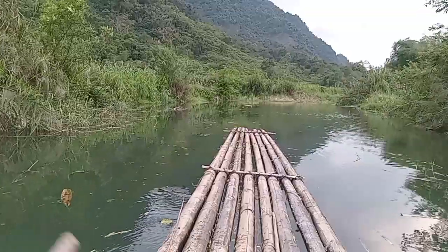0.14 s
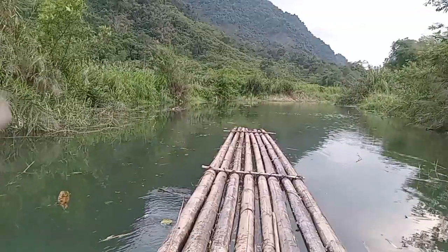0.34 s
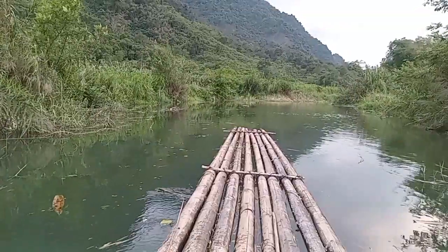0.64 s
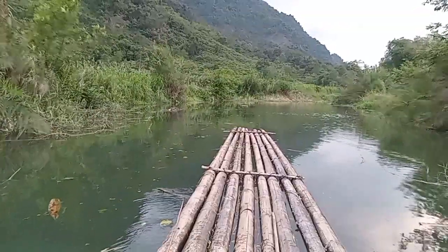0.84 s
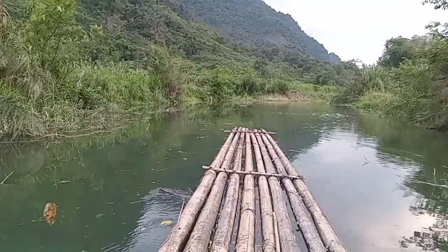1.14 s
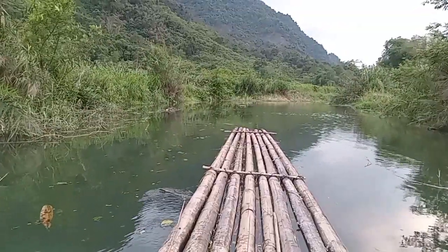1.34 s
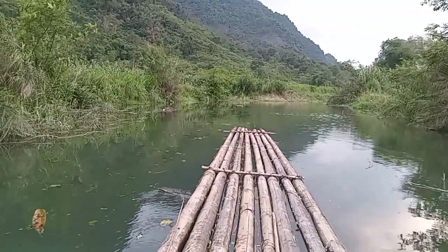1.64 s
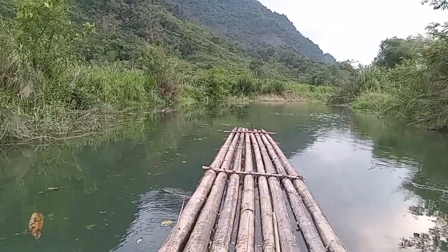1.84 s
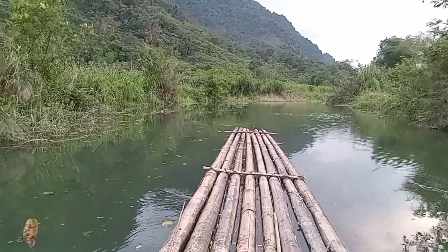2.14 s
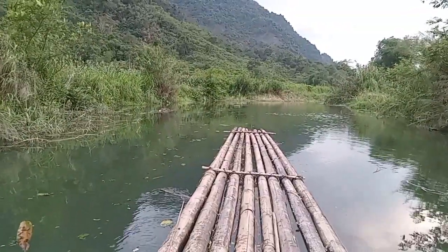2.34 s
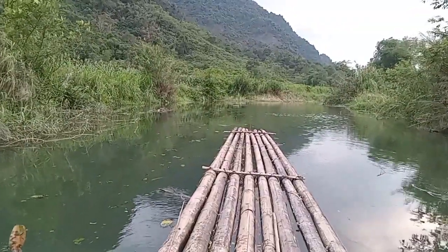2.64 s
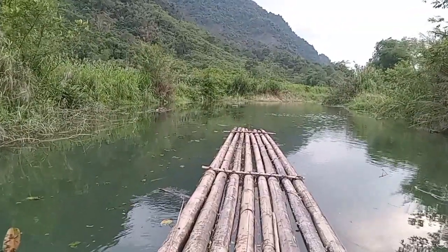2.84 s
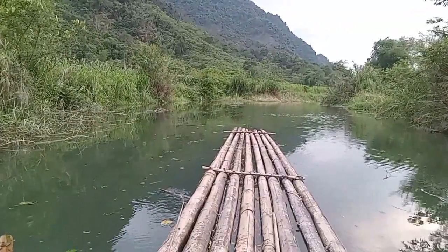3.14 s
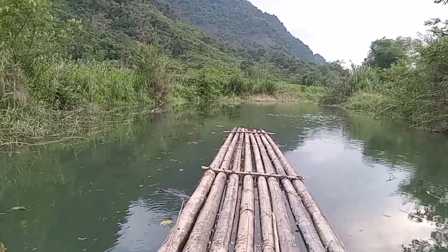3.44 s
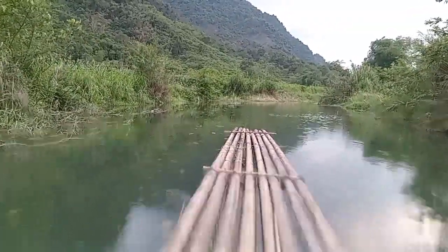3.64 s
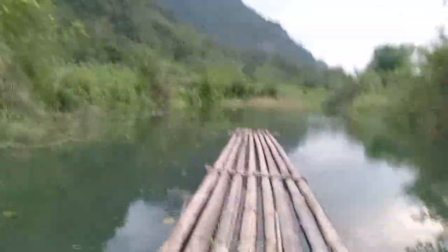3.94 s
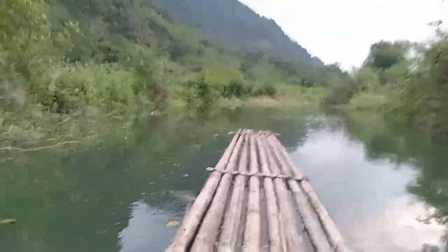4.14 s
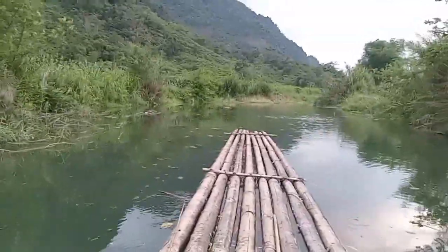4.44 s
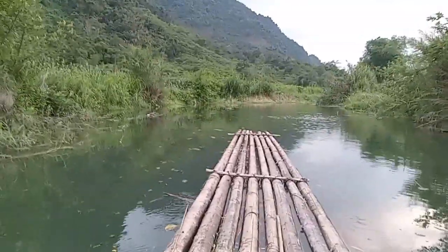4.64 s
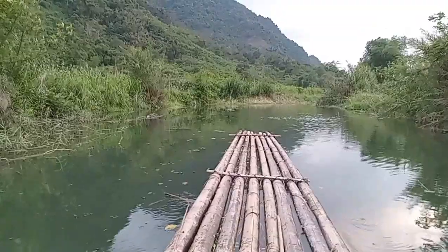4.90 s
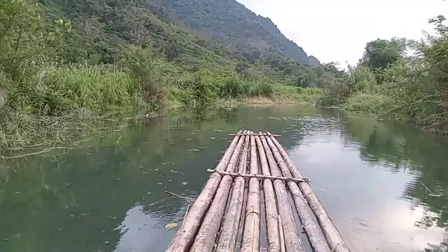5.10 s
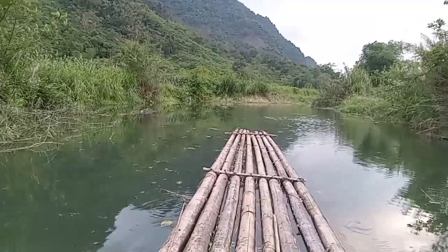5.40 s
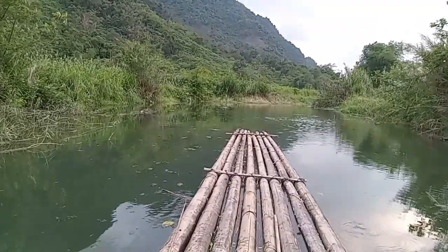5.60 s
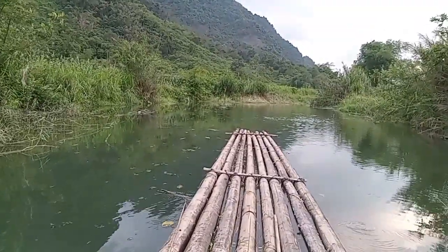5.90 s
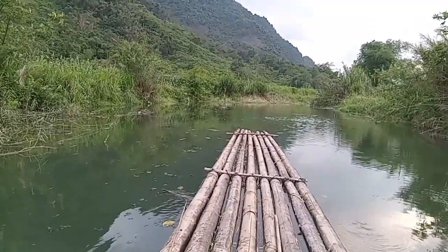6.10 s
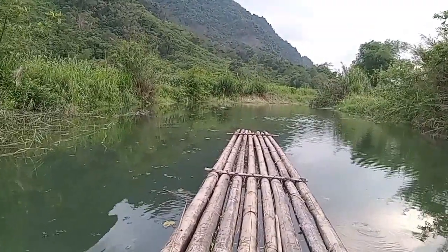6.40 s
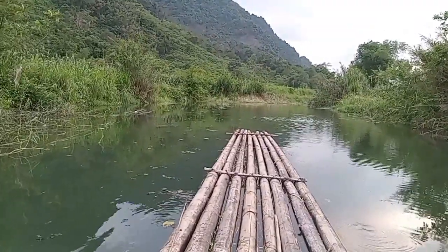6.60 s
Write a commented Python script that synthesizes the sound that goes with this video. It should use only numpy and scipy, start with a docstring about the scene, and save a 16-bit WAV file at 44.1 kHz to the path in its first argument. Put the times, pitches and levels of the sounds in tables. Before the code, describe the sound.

Water slaps, plops and glugs in short irregular bursts against a bamboo raft drifting on a calm river, over a thin constant bubbly fizz.

```python
"""Bamboo raft on a calm river

Water slaps and spatters against the poles in short irregular bursts, made of shaped noise and small bubbles.
Trapped air plops and glugs with rising pitch (gliding sines), and single drops tick (very short noise).
A fine high fizz of tiny ringing bubbles runs all the way through.
The raft's poles ring along, and it rumbles faintly (low noise) under the heavier water."""
import sys
import numpy as np
from scipy import signal
from scipy.fft import rfft, irfft, next_fast_len
from scipy.io import wavfile

SR = 44100
rng = np.random.default_rng(int(sys.argv[2]) if len(sys.argv) > 2 else 0)


def master(y):
    """Save y as 16-bit WAV."""
    cut = np.clip(np.atleast_2d(y).T, -1, 1)
    pcm = np.round(cut * 32767)  # scale
    wavfile.write(sys.argv[1], SR, pcm.astype(np.int16))


N = 297939
PADDED = next_fast_len(N, real=True)  # a length that the Fourier transform handles quickly

# wavelets running along the poles: t/s, slosh level/dB, gurgle level/dB, spatter level/dB, fizz level/dB,
# gurgle f/Hz, length/s
WAVELETS = [(0.721, -64.5, -62, -68.5, -61, 258, 0.12), (0.76, -59.5, -54, -58.5, -55, 520, 0.16),
            (1.098, -76, -59.5, -65.5, -52.5, 767, 0.11), (1.246, -90, -79, -66, -60.5, 700, 0.054),
            (1.931, -78, -84, -65.5, -63.5, 396, 0.046), (2.248, -65, -53, -62.5, -75, 794, .14),
            (2.32, -89, -62, -85, -67, 500, 0.12), (2.488, -66, -61, -65, -58.5, 455.7, 0.16),
            (2.87, -88, -59, -66.5, -61, 480, 0.21), (3.436, -70, -80, -68.5, -79, 755, 0.17),
            (3.567, -67, -44, -55, -52, 339, .17), (3.762, -55, -58, -59, -58, 330, 0.17),
            (3.88, -78, -67, -60, -73, 1400, 0.3), (3.967, -63.5, -70, -68, -56.5, 507, 0.36),
            (4.152, -57, -58.5, -61, -56.5, 330, .085), (4.34, -85, -58, -66.5, -52, 1530, 0.039),
            (4.532, -54, -53, -61.5, -55.5, 285, 0.12), (4.675, -64, -50.5, -84, -78, 290, 0.038),
            (4.89, -79.5, -86, -74.5, -59.5, 435, 0.5), (5.455, -53, -57, -60.5, -54.5, 717, 0.12),
            (5.691, -73, -74, -69.5, -58.5, 448, 0.2), (6.542, -84, -87, -76, -60, 450, 0.058)]
WAVELET_ATTACK = 0.25  # share of a wavelet's length that sets how slowly it swells

# colour of the fine fizz, also used for drops: f/Hz, level per Hz/dB
FIZZ_COLOUR = [(2500, -17), (3700, -8), (4100, -7.5), (4550, -1), (5200, -6.5), (6200, -2.5), (7000, 1),
               (7900, -1.5), (8900, 2.5), (10000, 0), (11000, -5.5), (12200, -13), (14000, -22),
               (15700, -25.5)]


def from_db(db):
    """Turn decibels into a gain."""
    return 10 ** (np.asarray(db) / 20)


def rms_one(x):
    """Scale a sound to an average strength (rms) of 1."""
    return x / np.sqrt(np.mean(x ** 2) + 1e-20)


def add(out, s, sound):
    """Mix a sound in at time s."""
    at = max(round(s * SR), 0)
    out[at:at + len(sound)] += sound[:max(N - at, 0)]


def coloured(x, spectrum):
    """Give a steady texture its colour, falling away beyond the ends; rms 1."""
    hz, db = np.transpose(spectrum)
    octave = np.log2(np.maximum(np.arange(PADDED // 2 + 1) * SR / PADDED, 1))
    octaves_outside = np.abs(octave - np.clip(octave, np.log2(hz[0]), np.log2(hz[-1])))
    gain = from_db(np.interp(octave, np.log2(hz), db) - 18 * octaves_outside)
    return rms_one(irfft(rfft(x, PADDED) * gain, PADDED)[:N])


def resonance(x, hz, width_hz):
    """Ring at one pitch: a two-pole resonance with gain 1 on top; a narrower one rings longer."""
    r = np.exp(-np.pi * width_hz / SR)
    numerator = np.array([1, 0, -1]) * (1 - r * r) / 2
    denominator = [1, -2 * r * np.cos(2 * np.pi * hz / SR), r * r]
    return signal.lfilter(numerator, denominator, x + 1e-18)


def flutter(per_s, depth_db):
    """A gain that wanders at random between values drawn per_s times a second."""
    knots = rng.standard_normal(4000)
    wander = np.interp(np.arange(N) / SR * per_s, np.arange(len(knots)), knots)
    return from_db(depth_db * wander)


def burst(length, attack):
    """Envelope of height 1 that swells, then dies away."""
    t = np.arange(int(6 * length * SR) + 2) / SR
    swelling = 1 - np.exp(-(t / (attack * length)) ** 2)
    shape = swelling * np.exp(-2 * t / length)
    return t, shape / shape.max()


def swells(rows, attack, calm_db):
    """Level of a texture: each row (t/s, level/dB, length/s) swells and dies over the calm; their powers add."""
    power = np.full(N, from_db(calm_db) ** 2)
    for s, db, length in rows:
        add(power, s, (from_db(db) * burst(length, attack)[1]) ** 2)
    return np.sqrt(power)


def grains(spectrum, per_s, size_db, sharpness, smooth_db):
    """Countless tiny bubbles of random size and pitch, over the smooth noise of those too small to tell apart."""
    present = rng.random(N) < per_s / SR
    sizes = from_db(size_db * np.minimum(rng.exponential(1, N), 4))
    clicks = present * sizes * rng.choice([-1, 1], N)
    pitches = np.geomspace(spectrum[0][0], min(spectrum[-1][0], SR / 2 - 2000), 20)
    dealt = rng.integers(0, 20, N)  # which pitch each click sets ringing
    rings = sum(resonance(clicks * (dealt == k), hz, hz / sharpness) for k, hz in enumerate(pitches))
    smooth = coloured(rng.standard_normal(N), spectrum)
    return rms_one(coloured(rings, spectrum) + from_db(smooth_db) * smooth)


def splashes(slosh, spray, blur_db=-6, blur_width=0.17):
    """Each splash shoves the water, throws spray and leaves a cloud of small bubbles in a blur of the same pitch."""
    # sharp splashes: t/s, slosh level/dB, spatter level/dB, spray level/dB, spatter f/Hz, length/s
    splash_rows = [(0.837, -62, -72, -58, 1140, 0.089), (0.897, -60, -54, -55.5, 1567, .014),
                   (1.116, -73, -66, -57.5, 1570, 0.057), (2.279, -73, -67, -66, 1356, .06),
                   (2.467, -69, -47.5, -68, 824, .018), (2.4968, -37, -37.5, -38.5, 1060, 0.0056),
                   (2.5, -43, -42, -61, 2480, 0.0095), (2.919, -70, -51.5, -59, 1327, 0.023),
                   (3.575, -41, -36.5, -35, 2100, 0.0094), (3.588, -26, -43, -37.5, 1300, .017),
                   (3.646, -37, -48.5, -49, 957, 0.019), (3.691, -43, -54.5, -51, 2780, 0.0087),
                   (3.76, -41, -44.5, -60, 1015, 0.01), (3.781, -44, -48, -47.5, 1156, 0.02),
                   (3.814, -28, -53, -42.5, 1405, 0.013), (3.917, -82, -52.5, -46, 1800, 0.014),
                   (4.011, -39, -48.5, -51.5, 1640, 0.021), (4.109, -50.5, -59, -51.5, 2030, 0.015),
                   (4.206, -40.5, -51.5, -56, 2380, 0.01), (4.519, -44.5, -48.5, -61, 1550, 0.025),
                   (4.595, -39.5, -39, -50, 1230, 0.0067), (4.603, -48.5, -44.5, -42.5, 1756, .015),
                   (5.463, -54, -48, -50, 2380, 0.022), (5.5, -55, -49, -54, 2360, .0093),
                   (5.684, -56, -65, -59.5, 1170, 0.026)]
    out = np.zeros(N)
    for s, slosh_db, spatter_db, spray_db, hz, length in splash_rows:
        shape = burst(length, attack=0.3)[1]
        size = np.linalg.norm(shape)
        span = round(s * SR) + np.arange(len(shape))
        blur = resonance(rng.standard_normal(len(shape)), hz, blur_width * hz)
        layers = (slosh[span], slosh_db), (blur, spatter_db + blur_db), (spray[span], spray_db)
        for texture, db in layers:
            shaped = shape * texture
            add(out, s, from_db(db) * size * shaped / np.linalg.norm(shaped))
        add(out, s, from_db(spatter_db) * size * bubble_cloud(hz, length))
    return out


def bubble_cloud(hz, length, per_s=800, spread_octaves=.33, cycles=14.0, size_db=4):
    """The small bubbles beaten in by one splash, scattered about one pitch; unit energy."""
    out = np.zeros(int(6 * length * SR) + SR // 4)
    draws = rng.standard_normal((120, 4))[:4 + int(per_s * length)]
    for a, b, pitch, size in draws:
        born = length * (a * a + b * b) / 4  # most are born early, a few late
        bubble_hz = hz * 2 ** (spread_octaves * np.clip(pitch, -2, 2))
        add(out, born, from_db(size_db * size) * bubble(bubble_hz, cycles))
    return out / np.linalg.norm(out)


def bubble(hz, cycles, rise=.05):
    """One small bubble: a damped sine that drifts up in pitch."""
    t, shape = burst(cycles / hz, attack=0.37)
    return shape * np.sin(2 * np.pi * hz * t * (1 + rise * t * hz / (2 * cycles)))


def plops(rise=0.025):
    """A pocket of air rings briefly, drifting up in pitch; gentler and lower ones ring longer."""
    # air pockets slapped shut between the poles, and small ringing bubbles: t/s, peak level/dB, f/Hz
    plop_rows = [(.767, -43, 93), (.788, -43, 710), (.836, -39.5, 462), (.847, -37.5, 465),
                 (1.128, -36.5, 750), (1.15, -42.5, 766), (2.263, -49, 457), (2.274, -50, 226),
                 (2.502, -35, 330), (2.839, -43.5, 482), (2.881, -52, 2160), (3.046, -45, 918),
                 (3.065, -54.5, 2500), (3.5769, -20, 403), (3.578, -23, 165), (3.588, -21.5, 303),
                 (3.606, -29, 470), (3.647, -38, 2640), (3.695, -33, 350), (3.696, -44, 2760),
                 (3.8, -39.5, 780), (3.819, -29, 427), (3.823, -28.5, 182), (3.959, -46, 2840),
                 (3.991, -29, 480), (4, -26, 537), (4.014, -29, 340), (4.046, -38, 2450),
                 (4.101, -42, 2960), (4.209, -30, 458), (4.307, -37, 485), (4.319, -38.5, 433),
                 (4.387, -51, 2470), (4.438, -56, 1090), (4.524, -37, 470), (4.709, -46, 508),
                 (4.855, -44.5, 460), (4.959, -55.5, 400), (5.041, -64, 426), (5.491, -35, 464.2),
                 (5.692, -48, 604), (5.914, -55, 573)]
    base_s = 0.0081  # length for a 500 Hz pocket at -35 dB
    pitch_power, db_per_doubling = .16, 29  # higher pitch shortens; this many dB gentler doubles the length
    out = np.zeros(N)
    for s, db, hz in plop_rows:
        length = base_s * (500 / hz) ** pitch_power * 2 ** ((-35 - db) / db_per_doubling)
        t, shape = burst(length, attack=0.19)
        phase = 2 * np.pi * np.cumsum(hz * (1 + rise * t / length)) / SR
        add(out, s, from_db(db) * shape * np.sin(phase) * rng.choice([-1, 1]))
    return out


def glugs(bend=1.52, swell=0.62):
    """A bubble's pitch climbs ever faster as the water above it thins; its loudness wobbles."""
    # larger bubbles nearing the surface: t/s, peak level/dB, first f/Hz, climb/(octaves per s), length/s
    glug_rows = [(1.243, -58, 793, 2, 0.049), (2.502, -39, 226, 7.8, 0.078), (2.525, -40, 376, 24.4, 0.061),
                 (2.56, -53.5, 252, 4.2, 0.068), (2.626, -67.5, 391, 7.2, 0.1),
                 (2.709, -58, 1360, 9.8, 0.038), (2.878, -47, 377, 11.7, 0.075),
                 (2.916, -43, 427, 30.6, 0.0524), (2.935, -62.5, 1395, 10, 0.051),
                 (2.939, -52.5, 973, 8.6, 0.078), (2.96, -67, 421, 2.2, 0.12),
                 (3.052, -60, 872, 8.5, 0.037), (3.61, -34, 300, 11, 0.023), (3.895, -49, 644, 18, .05),
                 (5.467, -37, 271, 18.5, .046), (5.506, -50, 261, 2.8, 0.063), (5.508, -52, 467, 8, 0.033),
                 (5.58, -49, 470, 27, 0.036)]
    out = np.zeros(N)
    for s, db, first_hz, climb, length in glug_rows:
        progress = np.linspace(0, 1, int(length * SR))
        hz = first_hz * 2 ** (climb * length * progress ** bend)
        shape = np.sin(np.pi * progress ** swell)
        add(out, s, from_db(db) * shape * np.sin(2 * np.pi * np.cumsum(hz) / SR))
    return out * flutter(per_s=260, depth_db=2.5)


def gurgles(width_share=0.25):
    """Each wavelet churns a gap between the poles, which rings roughly at its own pitch."""
    # ways the water in a gap rings: multiple of the wavelet's pitch, level/dB
    gap_modes = [(1, -4), (1.7, -10)]
    out = np.zeros(N)
    churn = rng.standard_normal(N)
    for s, _, db, _, _, hz, length in WAVELETS:
        shape = burst(length, WAVELET_ATTACK)[1]
        stirring = churn.take(round(s * SR) + np.arange(len(shape)), mode="wrap")
        for multiple, mode_db in gap_modes:
            centre, width = multiple * hz, width_share * hz
            gurgle = shape * resonance(resonance(stirring, centre, width), centre, width)
            add(out, s, from_db(db + mode_db) * np.linalg.norm(shape) * gurgle / np.linalg.norm(gurgle))
    return out


def slosh_texture():
    """Low moving water: sharply ringing bubbles over a little smooth noise."""
    # colour of the slosh: f/Hz, level per Hz/dB
    slosh_colour = [(110, -32.5), (170, -3), (300, -0.5), (480, -0.5), (700, -1), (1000, -12),
                    (1600, -24.5)]
    return grains(slosh_colour, per_s=500, size_db=3.5, sharpness=19.0, smooth_db=-7.5)


def spatter_texture():
    """Middle-pitched spatter: ringing bubbles and smooth noise in equal strength."""
    # colour of the spatter: f/Hz, level per Hz/dB
    spatter_colour = [(600, -17), (950, -6.5), (1300, -5.5), (1700, -1), (2100, -0.5), (2350, 0.5),
                      (2650, 0), (3300, -3.5), (4500, -6)]
    return grains(spatter_colour, per_s=1200, size_db=4.5, sharpness=24, smooth_db=0)


def spray_texture():
    """Bright spray: a dense crowd of tiny bubbles of very uneven size."""
    # colour of the spray: f/Hz, level per Hz/dB
    spray_colour = [(2400, -7.5), (3600, 2.5), (5000, 5.5), (7000, 4), (9000, 2), (11000, -3),
                    (13000, -4.5), (15500, -13)]
    return grains(spray_colour, per_s=4000, size_db=7.0, sharpness=12, smooth_db=-6.0)


def trickle(spatter_db, per_s=150, over_db=3, size_db=3, cycles=9.0):
    """Stray droplets plink at random, more often and louder the more the water is stirred."""
    out = np.zeros(N)
    stirred = np.interp(spatter_db, [-70, -60], [0, 1])  # the chance that a droplet sounds
    for when, chance, pitch, size in rng.random((1500, 4))[:int(per_s * N / SR)]:
        at = int(when * N)
        if chance < stirred[at]:
            db = spatter_db[at] + over_db + size_db * (2.46 * size - 2.5)
            add(out, at / SR, from_db(db) * bubble(1000 * 3.3 ** pitch, cycles))
    return out


def drops():
    """A drop hits the surface with a short bright tick of noise."""
    # single drops: t/s, level/dB
    drop_rows = [(.7446, -49), (2.3912, -44), (3.0472, -54), (3.2874, -46), (4.3442, -41), (4.3605, -41),
                 (4.6697, -44), (5.1872, -46), (5.4522, -46)]
    level = np.zeros(N)
    tick = burst(length=.002, attack=.12)[1]
    for s, db in drop_rows:
        add(level, s, from_db(db) * tick)
    return level * coloured(rng.standard_normal(N), FIZZ_COLOUR)


def raft(x, ring_db=-10, scatter_db=-13, scatter_s=0.017):
    """The hollow poles ring along, and the deck scatters a short tail."""
    # hollow poles answering a blow: f/Hz, width/Hz, level/dB
    pole_rows = [(155, 86, -6.5), (330, 35, -23.5), (430, 27, -14.5), (571, 21, -24), (1240, 47, 0),
                 (2480, 23, -21)]
    ringing = np.zeros(N)
    for k, (hz, width, db) in enumerate(pole_rows):
        ringing += (-1) ** k * from_db(db) * resonance(x, hz, width)
    t = np.arange(SR // 5) / SR
    tail = rng.standard_normal(len(t)) * np.exp(-t / scatter_s) * (t > .003)
    scattered = signal.fftconvolve(x, tail / np.linalg.norm(tail))[:N]
    return x + from_db(ring_db) * ringing + from_db(scatter_db) * scattered


def fizz(flicker_db=3.5, count=30):
    """Fine high fizz; every narrow band flickers on its own, and all a little together."""
    steady = rfft(grains(FIZZ_COLOUR, per_s=5900, size_db=2.5, sharpness=8, smooth_db=4), PADDED)
    place = np.interp(np.arange(len(steady)) * SR / PADDED, [3000, 15000], [0, count - 1])
    flickering = np.zeros(N)
    for k in range(count):
        band = irfft(steady * np.maximum(1 - abs(place - k), 0), PADDED)[:N]  # neighbours overlap
        flickering += band * flutter(per_s=45, depth_db=flicker_db)
    return rms_one(flickering * flutter(per_s=45, depth_db=2.0))


def fizz_strength(wavelet_rows):
    """A slowly changing fizz level, freshened by each wavelet; their powers add."""
    # strength of the steady high fizz: t/s, level/dB
    steady_level = [(0.0, -63.5), (1.62, -66), (2.05, -65.5), (2.43, -60), (3.31, -61.5), (3.61, -59),
                    (3.76, -54.5), (4.03, -54.5), (4.68, -59.5), (5.74, -57.5), (5.89, -60.5), (6.76, -60)]
    s, db = np.transpose(steady_level)
    steady = from_db(np.interp(np.arange(N) / SR, s, db))
    return np.hypot(swells(wavelet_rows, WAVELET_ATTACK, -np.inf), steady)


def rumble():
    """The raft heaves under the heavier water, then settles: low noise that swells and dies away."""
    # heaves of the raft: t/s, level/dB, length/s
    heave_rows = [(.755, -58, 0.17), (1.95, -64, 0.069), (2.27, -72, 0.11), (2.85, -69, 0.18),
                  (3.58, -40.5, 0.092), (3.78, -63, 0.84), (4.36, -60, 0.49)]
    # colour of the rumble: f/Hz, level per Hz/dB
    rumble_colour = [(18, -12), (45, 2.5), (65, -1), (100, 0), (140, -6), (260, -12.5)]
    level = swells(heave_rows, attack=0.16, calm_db=-78)
    return level * coloured(rng.standard_normal(N) * flutter(per_s=13, depth_db=1.0), rumble_colour)


def scene():
    """Wavelets and splashes stir the same slosh, wavelets freshen the fizz; bubbles and drops sound on top."""
    s, slosh_db, _, spatter_db, fizz_db, _, length = np.transpose(WAVELETS)
    # calm_db is the water between wavelets
    sloshing = swells(zip(s, slosh_db, length), WAVELET_ATTACK, calm_db=-82.5)
    spattering = swells(zip(s, spatter_db, length), WAVELET_ATTACK, calm_db=-75)
    fizzing = fizz_strength(zip(s, fizz_db, length))
    slosh = slosh_texture()
    wash = sloshing * slosh + spattering * spatter_texture()
    wash = wash + gurgles() + trickle(20 * np.log10(spattering))
    water = wash + splashes(slosh, spray_texture()) + plops() + glugs() + drops()
    return (raft(water) + fizzing * fizz() + rumble())[None]


def record(dry):
    """The top is cut steeply above 15.8 kHz."""
    low_pass = signal.ellip(10, .1, 70, 15800, fs=SR, output="sos")  # 0.1 dB ripple, 70 dB cut
    return signal.sosfilt(low_pass, dry)


dry = scene()
out = record(dry)
master(out)
```